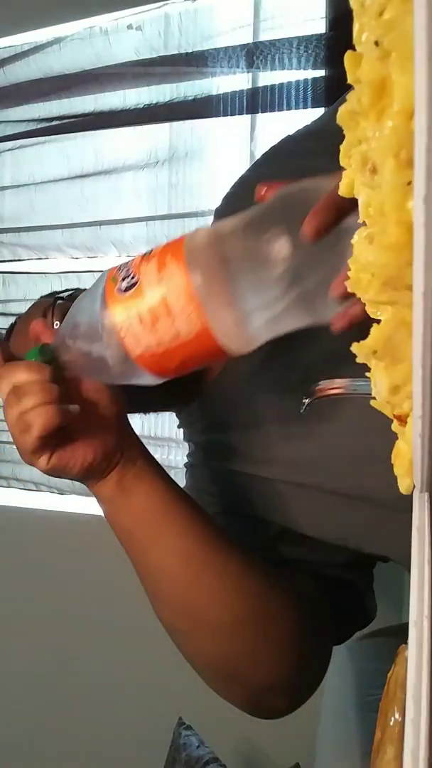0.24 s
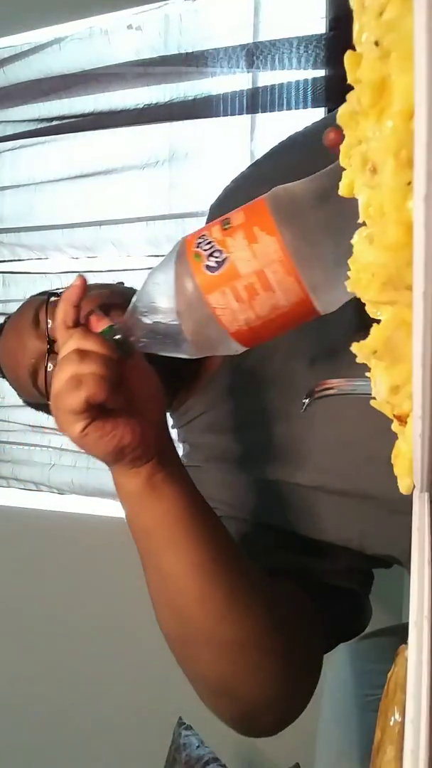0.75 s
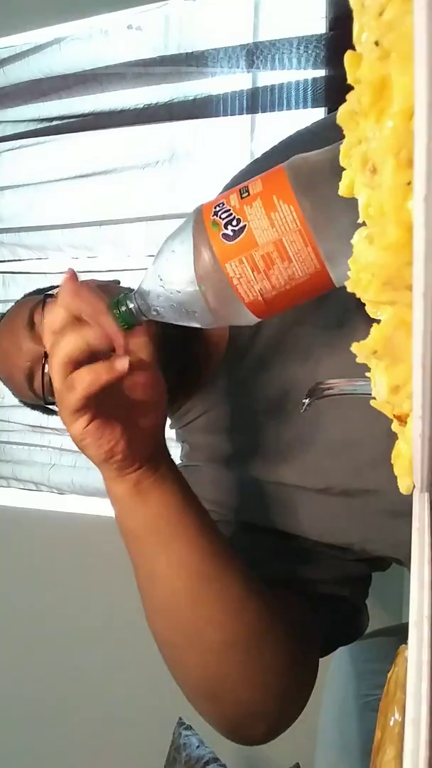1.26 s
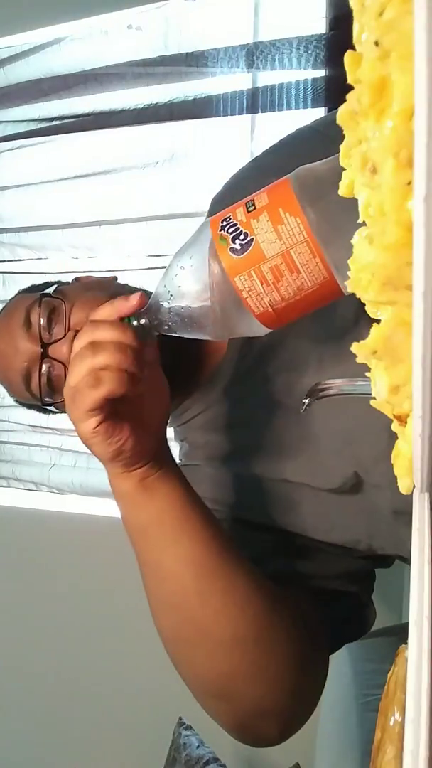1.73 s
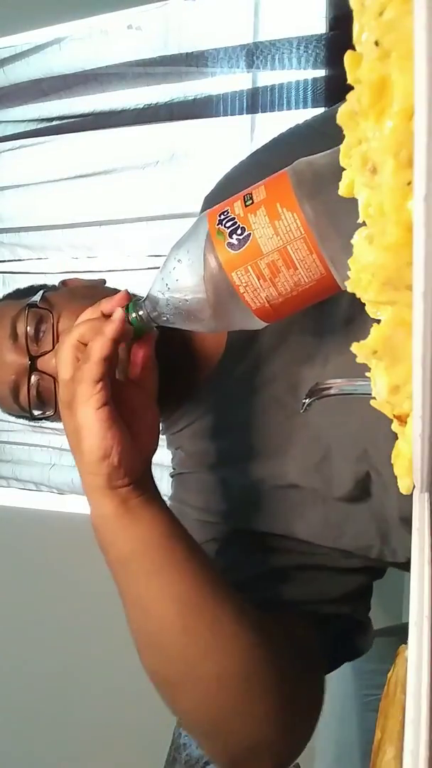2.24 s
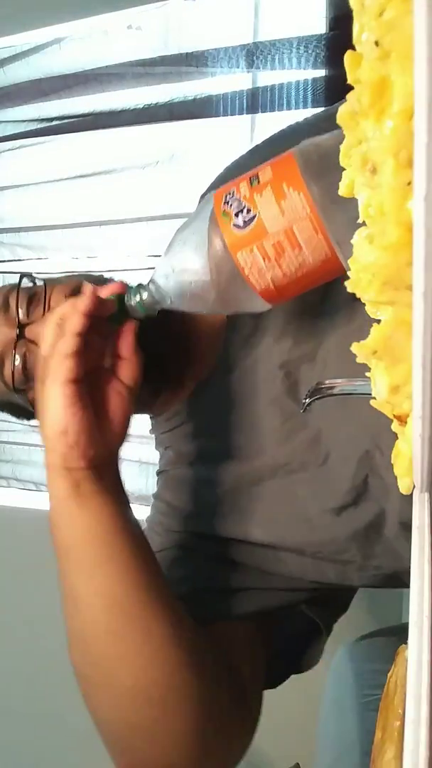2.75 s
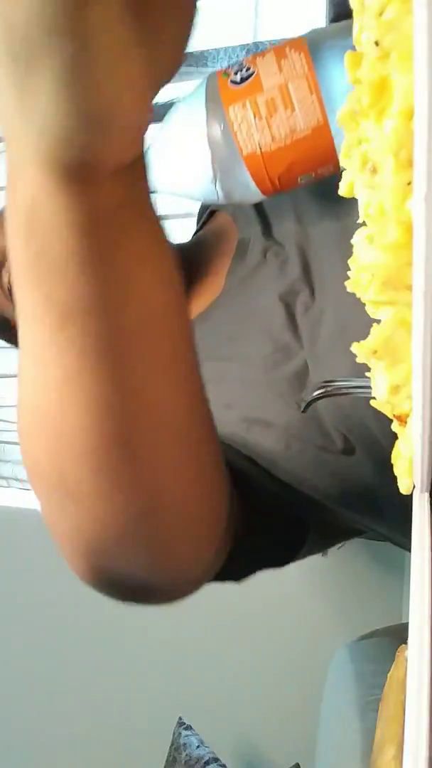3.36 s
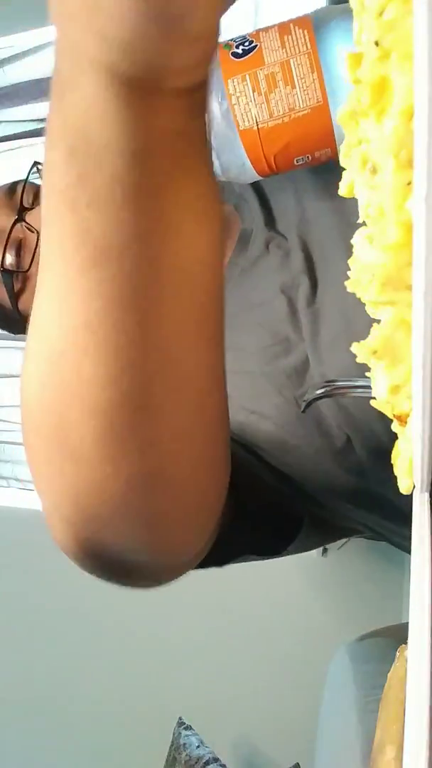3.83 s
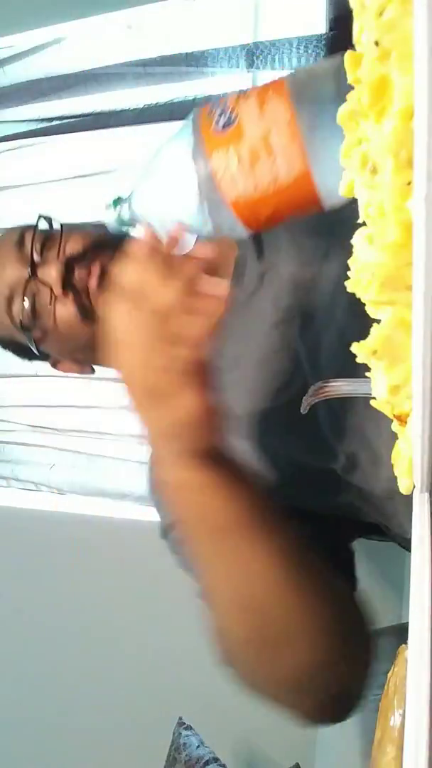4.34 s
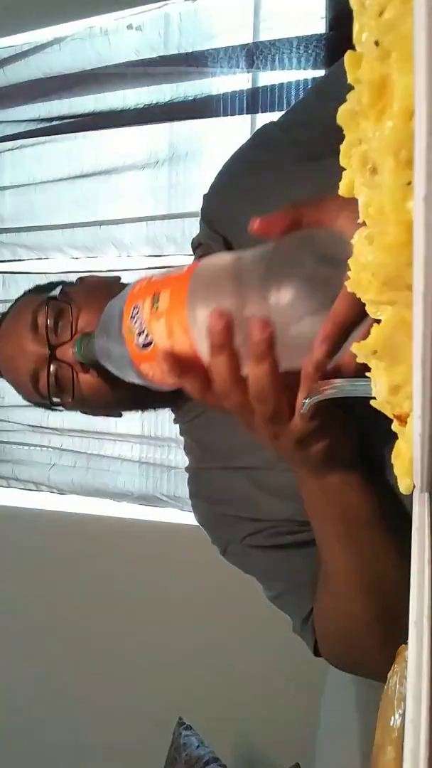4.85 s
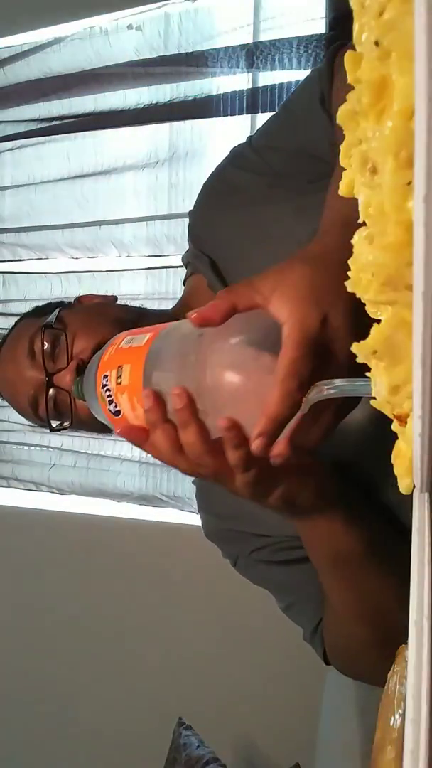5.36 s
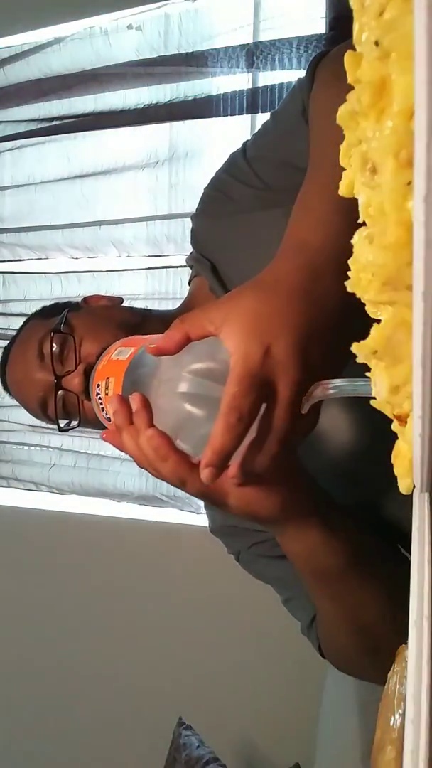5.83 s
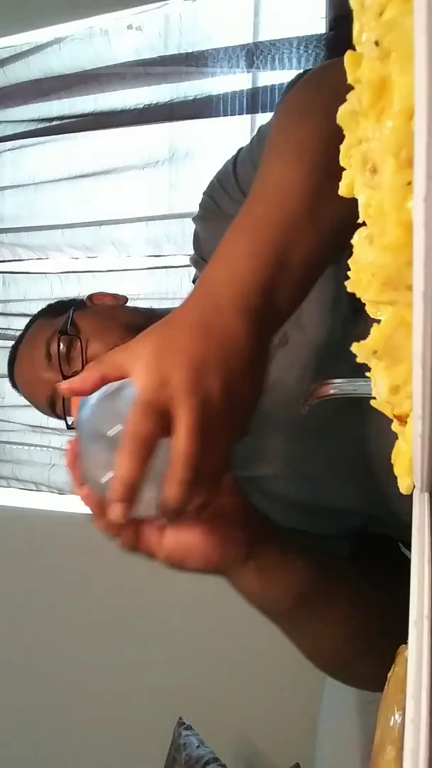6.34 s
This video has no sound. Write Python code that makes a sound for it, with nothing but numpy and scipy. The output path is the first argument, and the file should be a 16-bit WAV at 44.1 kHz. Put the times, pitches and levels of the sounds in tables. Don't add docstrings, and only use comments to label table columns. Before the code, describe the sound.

A close phone pickup in a quiet furnished room, with the low room hum almost entirely suppressed. From 0 to 1.1 s, fingers squeeze a thin plastic bottle: faint dry ticks, label crinkles and a thin palm hiss. At 1.12 s they grip the cap with small clicks, and at 1.23 s the seal breaks in a tight, bright crackle about 30 ms long. A clear slip clicks at 1.4 s, soft thread scrapes and a hollow catch follow around 1.45-1.6 s, then a sharp snap at 1.7 s. The fingers let go in a small flutter at 1.89 s. Only sparse faint ticks remain until 3.8 s, when the cap touches the table, then bounces with very loud, hard clacks at 3.87 s, fading by 4.0 s. At 4.72-4.78 s the bottle wall pops lightly. Isolated, barely audible ticks continue to about 6.4 s.

```python
import sys
import numpy as np
from scipy import signal
from scipy.fft import rfft, irfft
from scipy.io import wavfile
from scipy.ndimage import uniform_filter1d, minimum_filter1d

SR = 44100
rng = np.random.default_rng(int(sys.argv[2]) if len(sys.argv) > 2 else 0)


def makeup_ratio(level_db):
    decades = np.asarray(level_db, float) / 20
    return 10 ** decades


def waveform_to_disk(signal):
    frames = np.transpose(np.atleast_2d(signal))
    scaled = np.clip(frames, -1, 1) * 32767
    samples = np.round(scaled).astype(np.int16)
    wavfile.write(sys.argv[1], SR, samples)


N = 290822

# frequency_hz, density_db [dB per Hz]
HUM_SPECTRUM = [(15, -67), (25, -38.5), (46, -16.5), (107, -10), (209, -0.5), (331, -5.5), (368, -2),
                (522, -3), (566, 1), (1380, -11.5), (2690, -18.5), (3530, -22), (4490, -25.5), (6200, -39),
                (15500, -40)]
HUM_DB = -63

# start_s, pitch_hz, peak_db
TICKS = [(0.013, 2251, -47), (0.145, 1688, -40.5), (0.187, 2015, -45.5), (0.293, 1660, -41),
         (0.488, 1510, -43), (0.515, 1066, -40.5), (0.94, 2322, -43), (1.032, 2960, -44.5),
         (2.139, 1050, -39), (2.219, 1074, -39), (2.654, 1770, -44), (2.709, 3734, -50.5),
         (2.826, 2280, -45.5), (2.961, 2280, -46), (2.995, 3030, -52.5), (3.216, 822, -36),
         (3.598, 3800, -58.5), (4.333, 5500, -66), (4.455, 1049, -38.5), (5.047, 2820, -44.5),
         (2.33, 2970, -52), (5.136, 2283, -47), (5.185, 3040, -50), (5.197, 3823, -54),
         (5.404, 3858, -51.5), (5.583, 3805, -53), (5.705, 989, -40), (5.904, 2612, -50.5),
         (5.97, 4520, -53), (6.024, 218.4, -38)]
# start_s, pitch_hz, peak_db
MORE_TICKS = [(1.14, 1422, -39.5), (1.132, 1310, -40), (1.408, 940, -37), (1.412, 1330, -46),
              (1.425, 1410, -40.5), (1.45, 1420, -44.5), (1.48, 2320, -43), (1.495, 2050, -41),
              (1.6, 2440, -43.5), (1.8, 2860, -43), (1.6, 3600, -57.5), (1.585, 5700, -65.5),
              (2.1, 1000, -50), (1.5, 1020, -40), (3.883, 690, -31), (4.006, 1190, -34),
              (1.868, 5430, -59), (1.905, 4700, -59), (4.765, 1070, -34.5), (4.785, 1070, -34),
              (4.845, 300, -34.5), (4.88, 2850, -46.5), (4.91, 2750, -52), (1.704, 790, -32.5),
              (3.802, 850, -33.5), (4.9, 6300, -67), (6.411, 330, -36.5)]
# pitch_hz, level_db
WALL_MODES = [(1900, -42), (2750, -46.5), (2970, -53), (3450, -51), (3750, -49), (4070, -55), (4500, -55),
              (4800, -60), (5260, -64), (5520, -71), (6070, -74), (6930, -67), (7650, -71), (8660, -68)]
# start_s, length_s, strength_db, lowest_hz, highest_hz
SQUEEZES = [(.12, .05, -1.5, 5400, 5800), (.165, .015, 2.5, 2600, 9000), (.208, .03, -4.5, 3300, 7000),
            (0.267, .03, -1, 1700, 3900), (0.295, 0.019, -1, 4000, 7300), (.445, .03, -3, 1800, 5700),
            (0.481, .03, -0.5, 3900, 7200), (0.693, .02, -2.5, 2600, 3100), (.765, .05, -1, 7200, 8000),
            (.787, 0.013, -1.5, 4600, 4900), (0.866, .04, -2.5, 3300, 5700), (.935, .02, -0.5, 3300, 3600),
            (1.023, 0.028, 1, 4300, 5400), (1.08, .015, -2.5, 4300, 5400), (1.085, 0.035, 5, 6500, 7200)]
SCATTER_DB, SQUEEZE_DB = 4, -2
HOLD_DB, HOLD_END_S = -71, 1.183
RUB_DB, RUB_S = -68, 0.038
# start_s, length_s, level_db
DRAGS = [
    (1.458, .09, -55.5),
    (1.576, 0.14, -57.5),
]

# start_s, peak_db, tilt_db, room_db
CRINKLE = [
    (.162, -43, 0.047, -2),
    (.292, -47.5, 0.052, -2),
    (.483, -47, 2, -2),
    (1.032, -48, 0, -2),
]
# start_s, peak_db, tilt_db, room_db
GRIP = [
    (1.1154, -33.5, -1.5, -1),
    (1.1234, -39.5, -7, -5.5),
    (1.1305, -33.5, 0.4, -6),
    (1.1348, -31.5, -4, 0),
    (1.1516, -31.5, 10, -3),
    (1.1645, -39.5, 2, -0.5),
]
# frequency_hz, density_db
GRIP_COLOUR = [(600, -44), (1100, -22.5), (1430, -15.5), (1800, -19), (2150, -7.5), (2550, 2), (3040, -8.5),
               (3890, -9), (4400, -23), (6000, -43.5), (9000, -54.5)]
# start_s, peak_db, tilt_db, room_db
SEAL = [
    (1.2254, -26, 0.5, -7),
    (1.2278, -15.5, -3.5, -5.5),
    (1.2304, -19.5, 1.5, 1),
    (1.2323, -13.5, 1.5, -5),
    (1.2357, -16, -3, -1.5),
    (1.2374, -19, -6, -1.5),
    (1.2444, -26.5, 0, -2.5),
    (1.2523, -28, -2.3, -3.5),
]
# frequency_hz, density_db
SEAL_COLOUR = [(700, -51.5), (1400, -34), (1750, -17), (2100, -16.5), (2600, -6), (3320, -8), (4150, 4),
               (4770, -4), (5500, -21.5), (6300, -27), (7100, -24.5), (9000, -39), (11800, -48),
               (15500, -46)]
# start_s, peak_db, tilt_db, room_db
SLIP = [
    (1.4039, -21.5, -3.5, -5),
    (1.4623, -33, -2, -3.5),
    (1.4685, -27, -8, 0),
    (1.7499, -23, -3.5, -6),
]
# frequency_hz, density_db
SLIP_COLOUR = [(500, -43), (950, -17), (1420, -6.5), (1750, -15), (2300, -6), (2800, -0.5), (3500, -3.5),
               (4300, 0), (5200, -17), (6500, -29), (9000, -49)]
# start_s, peak_db, tilt_db, room_db
THREAD = [
    (1.5118, -24.5, 0.63, -2.5),
    (1.5675, -35, 2.07, -2),
]
# frequency_hz, density_db
THREAD_COLOUR = [(500, -35.5), (780, -17.5), (950, 10), (1200, -19), (1650, -16), (2000, 0.5), (2450, -5),
                 (2800, -3.5), (3600, -13.5), (4570, -15), (5500, -46), (8000, -49)]
# start_s, peak_db, tilt_db, room_db
SNAP = [
    (1.7008, -12.5, 1.2, -4),
    (1.7026, -25, -10.5, 1),
    (1.7125, -31.5, -2.5, -0.5),
]
# frequency_hz, density_db
SNAP_COLOUR = [(400, -35), (720, -7.5), (1020, 4), (1200, -10), (1470, 1.5), (2160, 2), (2960, -0.5),
               (3700, -2), (4460, -9.5), (5600, -26.5), (6800, -43.5), (9000, -51.5), (15000, -70)]
# start_s, peak_db, tilt_db, room_db
RELEASE = [
    (1.8881, -40, 11, -3.5),
    (1.8916, -33.5, -0.06, -5.5),
    (1.8937, -23.5, -4, -2.5),
    (1.8965, -26, 1.5, 1),
    (1.8993, -26.5, 0, 1),
    (1.9121, -30.5, -0.5, -5.5),
]
# frequency_hz, density_db
RELEASE_COLOUR = [(700, -44.5), (1300, -17), (1680, -5), (2000, -3), (2370, 1), (3100, -6.5), (3400, -20.5),
                  (3700, -14.5), (4320, -12), (4700, -26.5), (5500, -40.5), (7300, -50.5), (8050, -34),
                  (10000, -53)]
# start_s, peak_db, tilt_db, room_db
LANDING = [
    (3.7973, -17.5, 0, -7.5),
    (3.7995, -19.5, -3.5, -6),
    (3.802, -27, 0.5, -8),
]
# frequency_hz, density_db
LANDING_COLOUR = [(500, -30), (850, -14), (1150, 4), (1700, -2), (2400, -1.5), (3300, -10.5), (4200, -15),
                  (5300, -27), (7000, -36.5), (9000, -40.5), (15000, -63.5)]
# start_s, peak_db, tilt_db, room_db
BOUNCES = [(3.8629, -19, -7.5, -7.5), (3.8701, 3, 3.5, -18.5), (3.8714, 0, 1, -18.5),
           (3.8752, -19.5, -2, -12.5), (3.9007, -8.5, 3.5, -15), (3.9175, -12.5, 4.5, -11),
           (3.9313, -12, -5, -6), (3.9335, -17.5, -5, -8), (3.9366, -5.5, 0, -22.5),
           (3.9782, -22.5, -8.5, -8.5), (3.9927, -16, 1, -8.5)]
# frequency_hz, density_db
BOUNCE_COLOUR = [(300, -34), (560, -20), (770, -5.5), (1000, -12.5), (1500, 5.5), (1800, -8), (2440, 1),
                 (3250, -2), (3800, 1.5), (4250, -9), (4900, -1.5), (5700, -17.5), (8500, -35),
                 (15500, -56.5)]
# start_s, peak_db, tilt_db, room_db
DENT = [
    (4.7229, -22, 5.5, -1),
    (4.7251, -27.5, -6, -2.5),
    (4.7446, -23.5, -6.5, 1.5),
    (4.7569, -31, 2, -0.5),
    (4.7639, -29.5, -6.5, -0.5),
    (4.7841, -37, 1.4, -1.5),
]
# frequency_hz, density_db
DENT_COLOUR = [(1200, -42), (2000, -12.5), (2600, -1), (2900, -4), (3540, -14), (4060, 6.5), (4400, -11),
               (4650, -8), (5300, -20), (6300, -30.5), (7000, -40), (8200, -29.5), (10200, -38.5),
               (15500, -40.5)]

# frequency_hz, t60_s
ROOM_DECAY = [(500, 0.53), (1200, 0.54), (3000, 0.54), (5000, 0.46), (8000, 0.87), (15000, 0.44)]
# delay_s, level_db
ECHOES = [
    (.0029, -12.5),
    (.0052, -19.5),
    (.0068, -20.5),
]

DEPTH_DB = 20
OPENS_DB, OPEN_DB = 5, 12.5
GUARD_DB, GUARD_HZ = 7, 200
EDGE_HZ = 15550


def evened(x):
    return x / np.sqrt(np.mean(x ** 2) + 1e-20)


def read(points, hz):
    f, value = np.transpose(points)
    return np.interp(np.log(hz + 1), np.log(f + 1), value)


def add(mix, s, sound):
    part = mix[round(s * SR):][:len(sound)]
    part += sound[:len(part)]


def hum():
    hz = np.fft.rfftfreq(N, 1 / SR)
    spectrum = rfft(rng.standard_normal(N)) * makeup_ratio(read(HUM_SPECTRUM, hz))
    return makeup_ratio(HUM_DB + DEPTH_DB) * evened(irfft(spectrum, N))


def ticks():
    rows, out = TICKS + MORE_TICKS + squeezes(), np.zeros(N)
    chance = rng.uniform(-1, 1, (len(rows), 2))
    for (s, hz, db), (detune, beat) in zip(rows, chance):
        t = np.arange(0, .018 + 12.05 / hz, 1 / SR)
        mode = np.sin(2 * np.pi * hz * t)
        twin = 0.28 * np.sin(2 * np.pi * (hz + 60. * detune) * t + np.pi * beat)
        add(out, s - t[-1] / 2, makeup_ratio(db - 5.5) * (mode + twin) * np.hanning(len(t)))
    return out


def squeezes():
    chance = rng.uniform(-1, 1, (len(SQUEEZES), len(WALL_MODES), 2))
    rows = []
    for (s, length, strength_db, lo_hz, hi_hz), draws in zip(SQUEEZES, chance):
        for (hz, db), (late, uneven) in zip(WALL_MODES, draws):
            if lo_hz < hz < hi_hz:
                peak_db = db + strength_db + SQUEEZE_DB + SCATTER_DB * uneven
                rows.append((s + length / 2 * late, hz, peak_db))
    return rows


def hiss(lo_hz, hi_hz):
    band = signal.butter(4, [lo_hz, hi_hz], "band", fs=SR, output="sos")
    return evened(signal.sosfilt(band, rng.standard_normal(N)))


def rustle():
    t = np.arange(N) / SR
    palm = makeup_ratio(HOLD_DB) * np.clip((HOLD_END_S - t) / .1, 0, 1)
    for s, _, strength_db, _, _ in SQUEEZES:
        palm += makeup_ratio(RUB_DB + strength_db) * np.exp(-((t - s) / RUB_S) ** 2) / 2
    cap = np.zeros(N)
    for s, length, db in DRAGS:
        cap += makeup_ratio(db) * np.exp(-(2 * (t - s) / length) ** 2)
    return palm * hiss(3200., 5650.) + cap * hiss(1900., 4800.)


def ring(gain_db):
    log_gain = np.log(makeup_ratio(np.maximum(gain_db, -100)))
    return np.fft.ifft(np.exp(np.conj(signal.hilbert(log_gain)))).real[:len(gain_db) // 2]


def clicks(rows, colour, crack_s, blur, near, far):
    hz, t = abs(np.fft.fftfreq(2048, 1 / SR)), np.arange(300) / SR
    noises = rng.standard_normal((len(rows), len(t)))
    dry, wet = near.copy(), far.copy()
    front_db = read(colour, hz)
    around_power = uniform_filter1d(makeup_ratio(2 * front_db), size=41, mode="wrap")
    around_db = 10 * np.log10(around_power + 1e-12)
    blurred_db = (1 - blur) * front_db + blur * around_db
    octaves = np.log2(np.clip(hz, 900, 6000) / 2800)
    for (s, peak_db, tilt_db, room_db), noise in zip(rows, noises):
        crack = (t == 0) + 1.1 * noise * np.exp(-t / crack_s) * np.minimum(t / 0.00022, 1)
        own_db = 10 * np.log10(uniform_filter1d(abs(np.fft.fft(crack, 2048)) ** 2, size=9))
        lean_db = tilt_db * octaves - own_db
        click = signal.fftconvolve(crack, ring(front_db + lean_db))
        spread = signal.fftconvolve(crack, ring(blurred_db + lean_db))
        gain = makeup_ratio(peak_db) / abs(click).max()
        start = s - abs(click).argmax() / SR
        add(dry, start, click * gain)
        add(wet, start, spread * gain * makeup_ratio(room_db))
    return dry, wet


def room(x):
    turn, out = np.arange(N) / SR * 2 * np.pi * 9, np.zeros(N)
    for k in range(3):
        taps = np.zeros(SR // 2)
        at = np.arange(260, SR // 2 - 12, 12)
        taps[at + rng.integers(0, 12, len(at))] = rng.choice([-1., 1.], len(at))
        hz, t, z = signal.stft(taps, SR, nperseg=256)
        decay = makeup_ratio(-60 * t / read(ROOM_DECAY, hz)[:, None])
        tail = signal.istft(z * decay, SR, nperseg=256)[1]
        share = np.sqrt(2 / 3) * np.cos(turn + k * np.pi / 3)
        out += signal.fftconvolve(x * share, tail / np.linalg.norm(tail))[:N]
    return out


def scene():
    near, far = np.zeros(N), np.zeros(N)
    label_colour = [(900, -68.5)] + WALL_MODES + [(12000, -89)]
    # clicks, colour, decay of the crack [s], blur of the resonances in the room [0..1]
    for rows, colour, crack_s, blur in [
            (CRINKLE, label_colour, .001, .5), (GRIP, GRIP_COLOUR, .0008, .3),
            (SEAL, SEAL_COLOUR, .0006, .7), (SLIP, SLIP_COLOUR, .0005, .3),
            (THREAD, THREAD_COLOUR, .0005, .1), (SNAP, SNAP_COLOUR, .0005, .4),
            (RELEASE, RELEASE_COLOUR, .0007, .2), (LANDING, LANDING_COLOUR, .0012, .3),
            (BOUNCES, BOUNCE_COLOUR, .0011, .9), (DENT, DENT_COLOUR, .0008, .15)]:
        near, far = clicks(rows, colour, crack_s, blur, near, far)
    mix = near + room(far) + ticks() + rustle() + hum()
    dull = uniform_filter1d(near, size=4)
    for s, db in ECHOES:
        add(mix, s, makeup_ratio(db) * dull)
    return mix[None]


def suppress(x):
    hz, t, z = signal.stft(x, SR, nperseg=512, noverlap=384)
    memory = .45
    power = uniform_filter1d(abs(z) ** 2, size=2, axis=0)
    power = signal.lfilter([1 - memory], [1, -memory], power)
    rise_db = 10 * np.log10(power / np.median(power, axis=1, keepdims=True) + 1e-9)
    rise_db = rise_db - GUARD_DB / (1 + (hz[:, None] / GUARD_HZ) ** 2)
    wanted_db = -DEPTH_DB * np.clip((OPEN_DB - rise_db) / (OPEN_DB - OPENS_DB), 0, 1)
    held_db = -minimum_filter1d(-wanted_db, size=7, axis=1, origin=3)
    fall_db = 175 * t
    gain_db = np.maximum.accumulate(held_db + fall_db, axis=1) - fall_db
    return signal.istft(z * makeup_ratio(gain_db), nperseg=512, noverlap=384)[1][:N]


def overload(x):
    bend = 0.065 * uniform_filter1d(x ** 2, size=9)
    return x + signal.lfilter(*signal.butter(1, 70., "high", fs=SR), bend)


def limit(x):
    crest = uniform_filter1d(-minimum_filter1d(-abs(x), size=129), size=65)
    return x / np.maximum(crest / .985, 1)


def band_limit(x):
    return signal.sosfilt(signal.butter(12, 15490, fs=SR, output="sos"), x)


def record(dry):
    limited = limit(overload(suppress(dry[0])))
    finished = signal.oaconvolve(limited, signal.firwin(255, EDGE_HZ, fs=SR), "same")
    return band_limit(finished[None])


dry = scene()
out = record(dry)
waveform_to_disk(out)
```